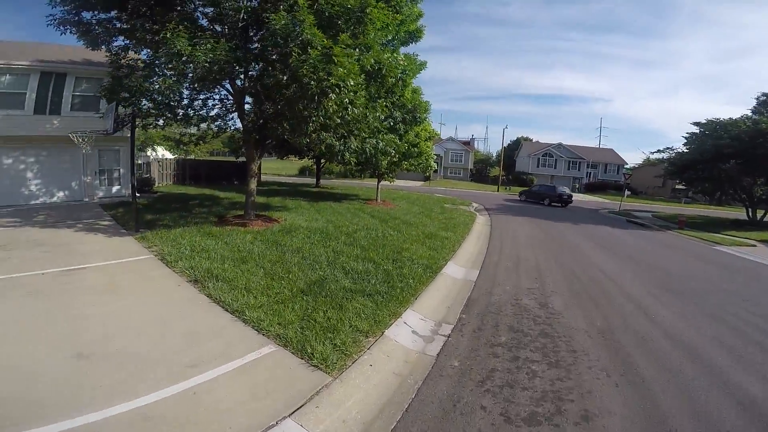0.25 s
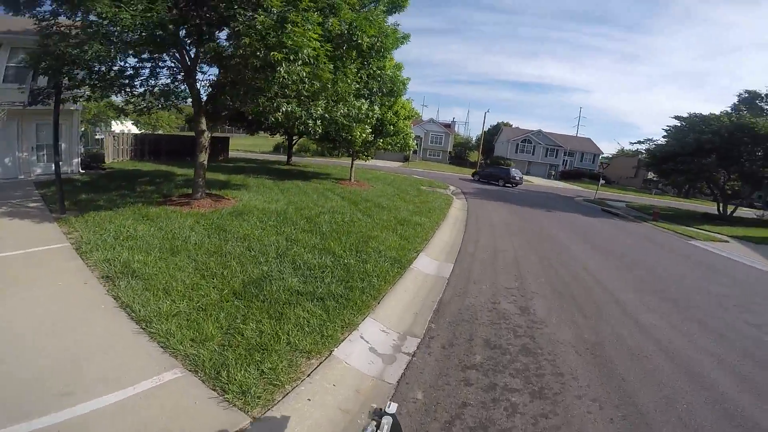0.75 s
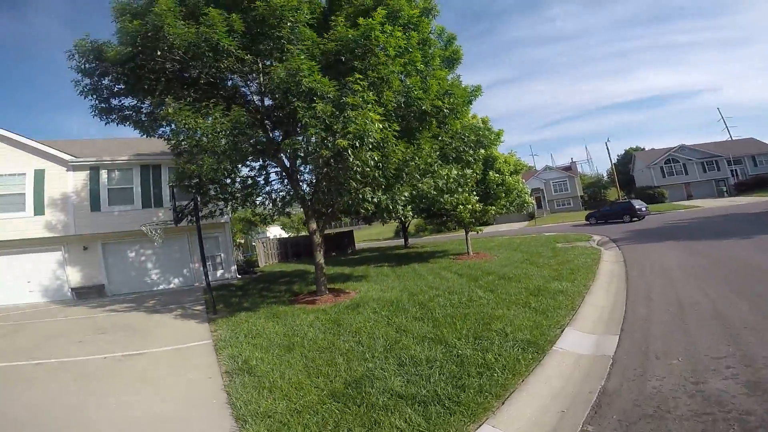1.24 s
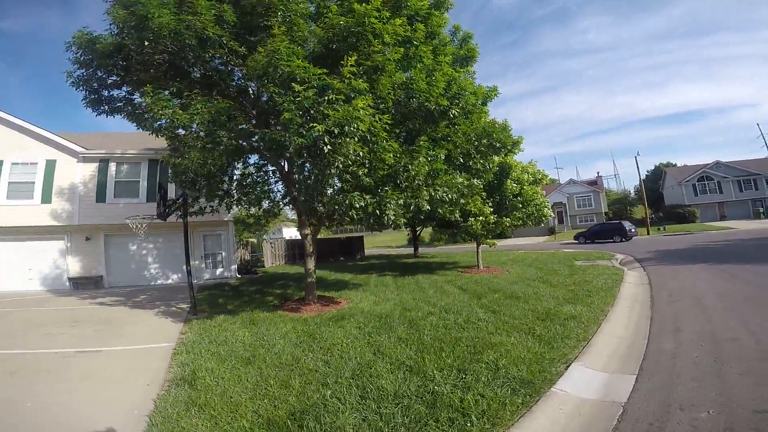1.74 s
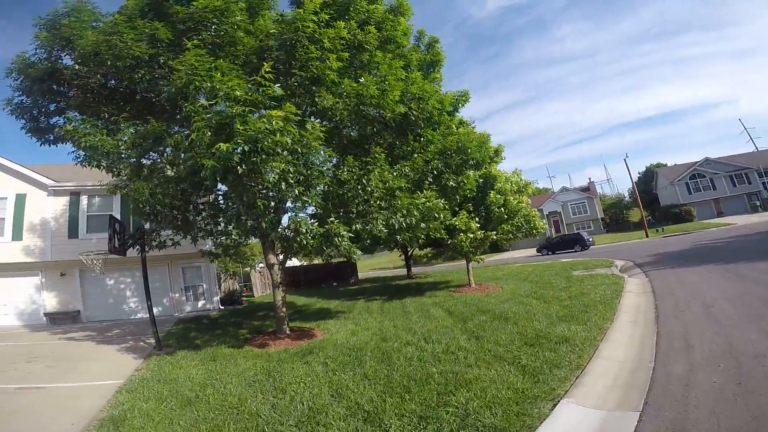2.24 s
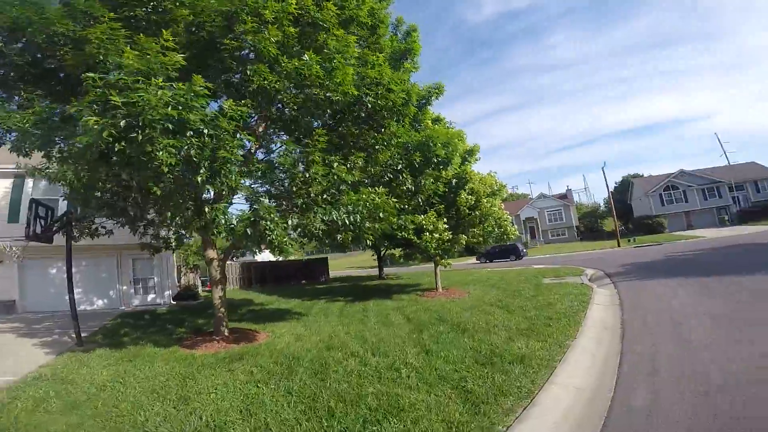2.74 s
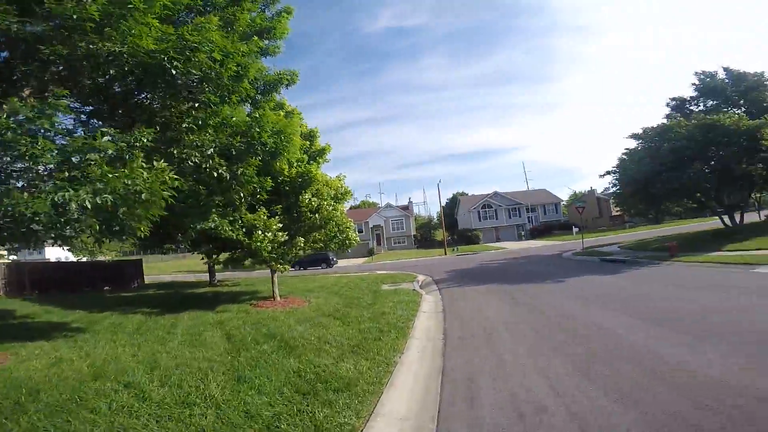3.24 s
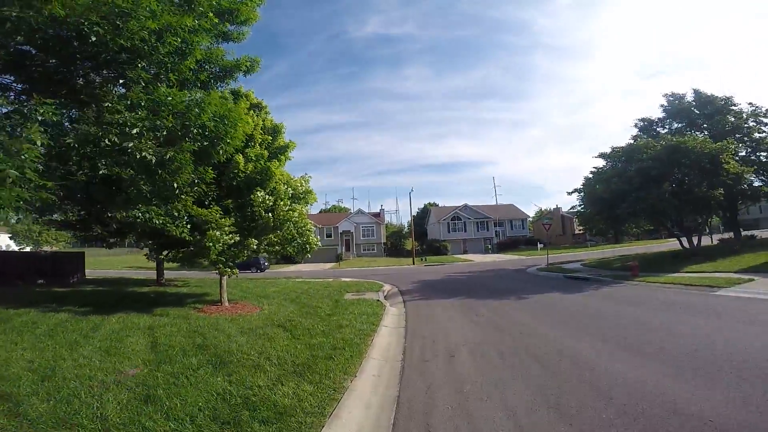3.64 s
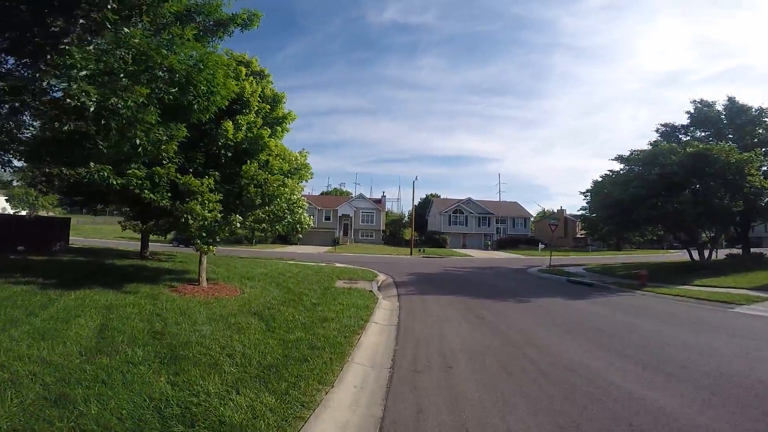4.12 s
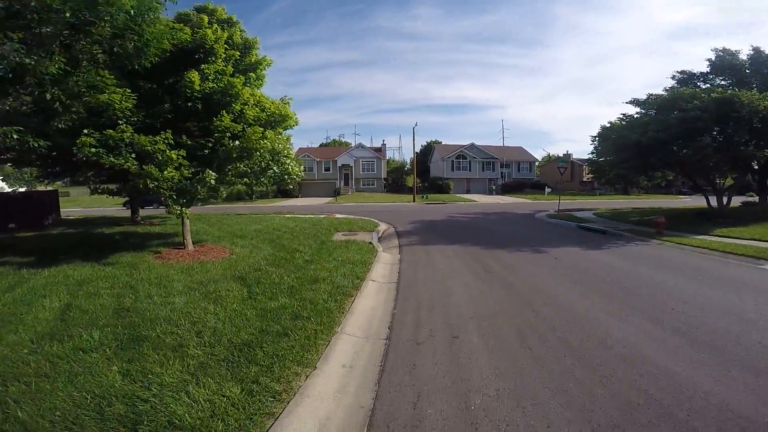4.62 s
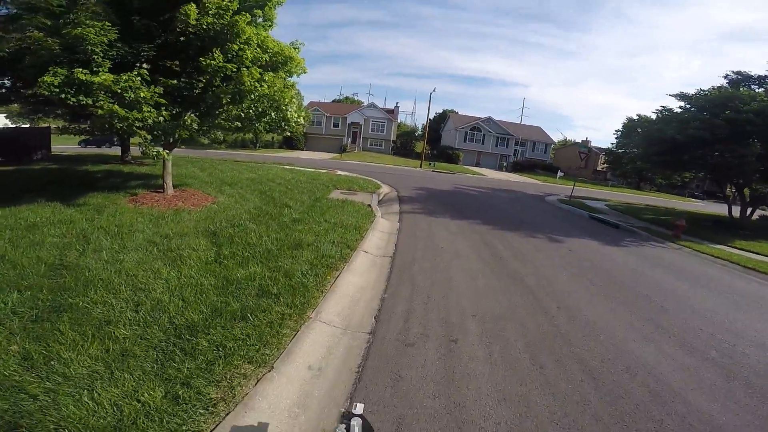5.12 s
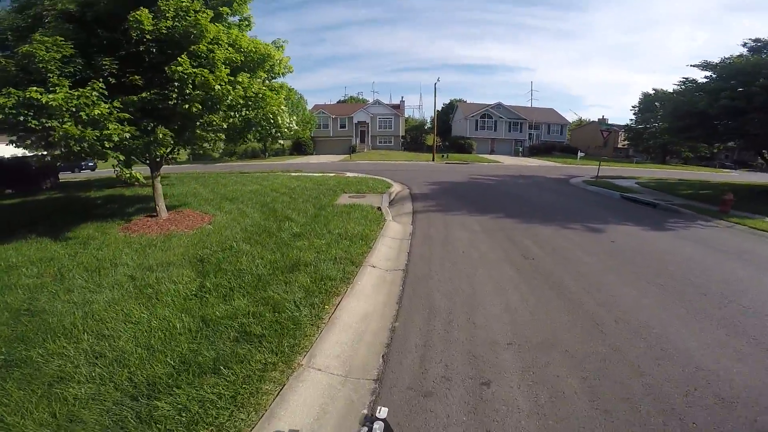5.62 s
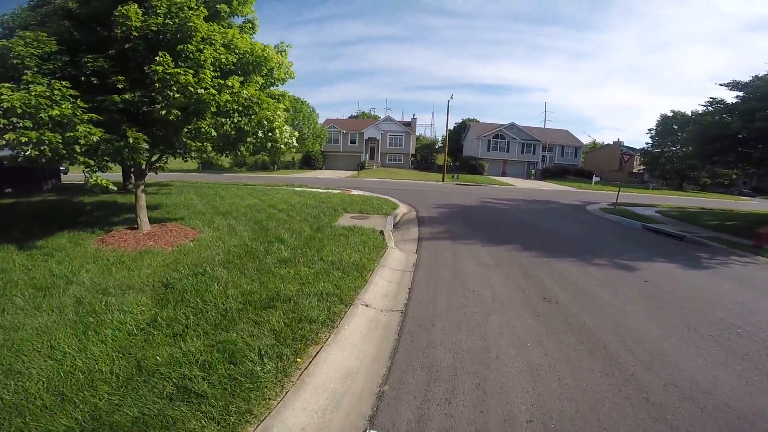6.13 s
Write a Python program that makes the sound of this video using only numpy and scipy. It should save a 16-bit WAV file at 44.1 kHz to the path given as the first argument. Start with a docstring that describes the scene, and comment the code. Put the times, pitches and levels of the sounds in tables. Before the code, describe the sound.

A small petrol engine, a garden edger carried along a residential street, is already idling at 0 s and never stops. It fires roughly ten times a second, slightly uneven in timing and strength: each firing is a short, dry, raspy pop with a hollow low muffler ring and a hard, bright metallic edge. Between pops, pistons and gears chatter over a steady rough clatter. Footfalls come about every 0.55 s from the start to around 6.2 s, each a very deep, soft thump and fluttering wobble shaking the body-worn microphone. From about 1 s the clatter swells and brightens, strongest between 1.4 and 3 s, with some sharper cracks. Just after 3 s the treble drops back and the idle settles, duller and steadier, until the end near 6.4 s. Faint street air lies underneath; the sound is close and dry, without a clear rev-up.

```python
"""From the start a small petrol engine idles, carried by a walker: it fires on every second turn of the crank.
At each firing, port pulses ring the muffler and a burst of blast noise rings the hard case round the microphone;
contacts of piston, ports and gears then rattle the case until the next firing, over a steady clatter.
About every half second a footfall jolts the body-worn microphone into a deep decaying wobble.
The clatter grows after the first second and eases after the third; faint street noise lies under it all."""
import sys
import numpy as np
from scipy import signal
from scipy.io import wavfile

SR = 44100
rng = np.random.default_rng(int(sys.argv[2]) if len(sys.argv) > 2 else 0)


def master_out(mix):
    """Clip the mix to full scale and print it as 16-bit PCM to the path in sys.argv[1]."""
    frames = np.transpose(np.atleast_2d(mix))
    ceiling = np.clip(frames, -1, 1)
    pcm = np.round(ceiling * 32767).astype(np.int16)
    wavfile.write(sys.argv[1], SR, pcm)


def level_to_linear(level):
    """Convert decibel levels to linear amplitude factors, elementwise."""
    exponent = np.asarray(level, float) / 20
    return 10 ** exponent


N = 280917  # length in samples

# Far street and air spectrum, before its overall level is set.
# Each row: frequency in Hz, relative density in dB per Hz.
STREET_SPECTRUM = [(70, -9.5), (100, -13), (150, -26.5), (200, -35), (260, -23.5), (330, -26), (850, -30),
                   (1300, -45), (2200, -36), (6000, -40.5), (8000, -47), (15000, -49.5)]
# Heel strikes, feet in turn. Each row: crest in seconds, wobble peak in dB, wobble in Hz,
# base level in dB of the lesser jolts before the heel, base level in dB of those after it.
FOOTSTEPS = [(0.019, -5, 24.4, -53, -20), (0.556, -8, 29, -18, -14), (1.11, -7, 31.2, -13.5, -17),
             (1.684, -7, 35, -18.5, -12.5), (2.223, -9, 33.4, -19.5, -14), (2.797, -8, 33.7, -24, -13.5),
             (3.332, -10.5, 36.3, -16, -18), (3.91, -7, 33.8, -18, -13.5), (4.461, -8.5, 35.6, -14, -16),
             (5.036, -8.5, 32.7, -21, -13), (5.582, -9.5, 35, -36, -18.5), (6.161, -7, 34.9, -18, -14.5)]
# Lesser jolts round each heel, one list per foot. Each row: time from the heel in ms,
# level in dB over the base level of that step, wobble in Hz, rise in ms, ring in ms.
LESSER_JOLTS = [
    [(-43.5, -7.6, 35.4, 21, 31), (42.5, -7.5, 29.4, 23, 64), (84.5, 0.5, 26.9, 27, 36),
     (126.5, -1, 34, 23.4, 82)],
    [(-123, 1, 41, 11, 33.5), (-41, -3, 35, 21, 50), (40, -6.5, 35.2, 22, 50),
     (82.5, -0.1, 35.04, 22.6, 91), (150.5, -5.5, 35.9, 19, 65.4)],
]
# Fall time of the heel wobble in ms: first foot, second foot.
HEEL_FALL_MS = [44, 30]
# Low random rumble through each stride, strongest round each heel.
# Each row: share of the way from heel to heel, rms in dB.
STRIDE_RUMBLE = [(0.0, -25.5), (0.08, -24.5), (0.34, -39), (0.72, -35), (1.0, -24)]
# Engine firings. Each row: time in seconds, strength in dB before the group offsets,
# 1.8 kHz ring in dB over the strength, crack above 4.7 kHz in dB over the strength.
ENGINE_FIRINGS = [(0.0482, -33.5, -9, -12.5), (0.1416, -26.5, -9.5, -20.5), (0.2424, -28, -14, -17),
                  (0.3278, -26.5, -15, -17), (0.4211, -30.5, -8.5, -12), (0.5159, -24.5, -18, -21),
                  (0.6067, -28.5, -11.5, -19), (0.7037, -27, -14.5, -18.5), (0.8052, -29, -13, -18),
                  (0.9076, -25.5, -12.5, -23), (1.002, -25.5, -16, -21), (1.0946, -28, -13.5, -16.5),
                  (1.1809, -30, -10.5, -18), (1.2815, -23.5, -20, -20), (1.3722, -27.5, -10, -18),
                  (1.475, -25, -14, -15.5), (1.5673, -23, -14.5, -14), (1.6613, -26.5, -7.5, -9),
                  (1.7593, -24.5, -12.5, -16.5), (1.866, -20.5, -13.5, -19), (1.9573, -23, -15, -12),
                  (2.0473, -27, -7, -10), (2.1444, -28, -10, -12), (2.2376, -23.5, -13, -16.5),
                  (2.3363, -29, -7.5, -11), (2.436, -22.5, -18, -18), (2.5229, -28.5, -8.5, -14),
                  (2.621, -29.5, -10.5, -15), (2.7305, -28, -9.5, -10.5), (2.801, -37, -16, -9),
                  (2.9028, -22, -14.5, -17), (2.997, -20.5, -14, -19), (3.0784, -22.5, -14, -15.5),
                  (3.1672, -24.5, -14, -19.5), (3.265, -23.5, -14, -22.5), (3.365, -24, -24, -23),
                  (3.461, -26, -6.5, -23), (3.5626, -27, -6, -19), (3.6663, -22.5, -14, -21.5),
                  (3.7609, -26, -13, -20), (3.8591, -24, -15, -21), (3.9514, -23, -14, -21.5),
                  (4.0458, -26, -12, -20), (4.138, -22.5, -12.5, -21.5), (4.235, -25.5, -12.5, -20),
                  (4.3332, -26.5, -13, -15.5), (4.429, -24, -17, -20), (4.5194, -25, -14, -21),
                  (4.6136, -26, -14.5, -20), (4.7058, -26.5, -10, -25), (4.8097, -25.5, -12, -20),
                  (4.9079, -29, -12.5, -14.5), (5.002, -24.5, -12.5, -19), (5.0887, -25.5, -13, -22),
                  (5.1792, -31.5, -13, -25), (5.2825, -26.5, -13.5, -22), (5.3816, -26.5, -19, -22.5),
                  (5.476, -24.5, -19, -20), (5.5694, -29.5, -11, -18.5), (5.6746, -28.5, -9, -22),
                  (5.7749, -28.5, -16, -20), (5.8704, -25.5, -17.5, -19), (5.9621, -24.5, -13.5, -21),
                  (6.0526, -27, -13.5, -20.5), (6.1477, -28.5, -16, -22), (6.241, -25.5, -14, -23.5),
                  (6.3405, -24, -14.5, -24)]
# Muffler resonances. Each row: frequency in Hz, 60 dB decay time in seconds.
MUFFLER_MODES = [(137, 0.25), (240, 0.054), (420, 0.022), (555, 0.01), (800, 0.023)]
# Port pulses. Each row: share of the cycle (negative: before the firing), sign,
# time in ms until the ringing is shut off.
PORT_PULSES = [(-.026, -1, 20), (-.022, 1, 19), (.115, -1, 12), (.494, 1, 11), (.606, -1, 14)]
# Port pulse levels before swing, scatter and smoothing.
# Each row, one per port pulse: level in dB for each muffler resonance in turn.
PORT_LEVELS = [(-53.5, -63, -45, -45, -63.5), (-39, -58.5, -45.5, -44.5, -93), (-66, -46, -56, -47.5, -56),
               (-43.5, -46.5, -54.5, -64, -82), (-61, -45, -54, -55, -87)]
# Case resonances round the microphone, in five groups. Each row: frequency in Hz, width in Hz, relative dB.
CASE_GROUPS = [
    [(1242, 61, -12.5), (1620, 50, -16), (1697, 134, -3), (1903, 147, 9.5)],
    [(2596, 60, -4), (2802, 87, 0), (2804, 150, -4), (3160, 190, 7.5)],
    [(3779, 120, 14), (3960, 330, 12.5), (4260, 33, 10.5), (4600, 70, -27)],
    [(4860, 150, 0), (5170, 470, 7.5), (5570, 130, 4.5), (5640, 160, -4), (6650, 180, -19),
     (6680, 110, 0.5)],
    [(7200, 130, -1), (7710, 61, -2), (8170, 150, -4), (9520, 530, -1.5), (10750, 740, -9),
     (13300, 500, -12), (14250, 380, -10)],
]
# Pass band of each case group. Each row: low edge in Hz, high edge in Hz.
CASE_BANDS = [(900, 1817), (2200, 3283), (3460, 4500), (4760, 6450), (6900, 14300)]
# Steady clatter as the engine swings nearer and away, before the group offsets.
# Each row: time in seconds, level in dB at 2-4.5 kHz, level in dB of the treble above 4.7 kHz.
CLATTER_CURVE = [(0.02, -46.5, -60), (0.48, -47.5, -61.5), (0.9, -49.5, -61), (1.43, -44, -57.5),
                 (1.77, -43.5, -57), (2.16, -44, -56.5), (2.64, -45, -56.5), (2.99, -44, -55),
                 (3.2, -47.5, -63), (3.48, -48, -64.5), (3.98, -47, -63.5), (6.37, -49, -65)]
# One entry per case group: column of the clatter curve that drives it.
CLATTER_COLUMN = [1, 1, 1, 2, 2]
# One entry per case group: firing column that colours its blast (0: none).
BLAST_COLUMN = [2, 0, 0, 3, 3]
# One entry per case group: offset in dB on the clatter.
CLATTER_OFFSET_DB = [-8.5, -8, -11.5, -5, -19.5]
# One entry per case group: offset in dB on the blast.
BLAST_OFFSET_DB = [-3.5, -13, -18, -4.5, -15]
# One entry per case group: share of the cycle at which the blast enters it;
# the 1.8 kHz ring speaks first, the 4 kHz ring last.
BLAST_ENTRY = [-0.0174, -0.0077, -0.003, -0.0053, -0.0056]
# Contacts of piston, ports and gears. Each row: share of the two-turn cycle, decay in ms,
# dB over the clatter, frequency in Hz where it rings most, dB lost one octave away.
ENGINE_CONTACTS = [(.05, 23.5, 8.5, 3570, 3), (.135, 3, 14.5, 8500, 9.5), (.185, 6, 8.5, 3930, 36),
                   (.245, 3.4, 8, 4000, 14), (.32, 8.8, 11.5, 2730, 47), (.358, 1, 11.5, 4600, 6),
                   (.56, 5.8, 6.5, 3400, 11.5), (.612, 2.6, 6, 6000, -0.5), (.68, 3.6, 8.5, 3900, 24),
                   (.745, 4.1, 11, 3800, 22), (.85, 9.6, 9.5, 2680, 41), (.882, 1.7, 9, 4200, 4),
                   (.925, 5.2, 7, 2520, 26)]

STREET_DB = -56.5                # rms
SHAKE_DB, SNAP_DB = -18, -11.5   # relative to the wobble of each jolt
HEEL_RISE_MS = 28.5
PORT_FOLLOWS = 0.27              # share of a firing's swing in dB that its port pulses follow


def rms_one(x):
    """Scales to rms 1."""
    return x / np.sqrt(np.mean(x ** 2) + 1e-20)


def band(x, low_hz, high_hz, order=2):
    """Butterworth band-pass."""
    return signal.sosfilt(signal.butter(order, [low_hz, high_hz], "band", fs=SR, output="sos"), x)


def street():
    """Smooth far noise, built from half-octave bands."""
    hz, db = np.transpose(STREET_SPECTRUM)
    edges = 70 * 2 ** np.arange(0, 8.1, .5)
    white = rng.standard_normal((2, N))   # neighbouring bands take different noise
    total = np.zeros(N)
    for k, (low, high) in enumerate(zip(edges, edges[1:])):
        level_db = np.interp(np.log(low * high) / 2, np.log(hz), db)
        total += level_to_linear(level_db) * band(white[k % 2], low, high)
    return level_to_linear(STREET_DB) * rms_one(total)


def jolts():
    """Heel strikes and lesser jolts of each foot: crest s, wobble peak dB, wobble Hz, rise ms, ring ms."""
    rows = []
    for k, (s, heel_db, heel_hz, before_db, after_db) in enumerate(FOOTSTEPS):
        foot = k % 2
        rows.append((s, heel_db, heel_hz, HEEL_RISE_MS, HEEL_FALL_MS[foot]))
        for ms, db, hz, rise_ms, ring_ms in LESSER_JOLTS[foot]:
            base_db = before_db if ms < 0 else after_db
            rows.append((s + ms / 1000, db + base_db, hz, rise_ms, ring_ms))
    return rows


def footfalls(snap_ms):
    """Each jolt snaps and wobbles the mount with loose shaking; a low random rumble never stops."""
    out, moving = np.zeros(N), np.zeros(N)
    for s, db, hz, rise_ms, ring_ms in jolts():
        at = np.arange(max(int((s - .08) * SR), 0), min(int((s + .2) * SR), N))
        ms = 1000 * (at / SR - s)
        bell = level_to_linear(db) * np.exp(-(ms / np.where(ms < 0, rise_ms, ring_ms)) ** 2)
        wobble = bell * np.cos(2 * np.pi * hz * (at / SR - s))
        snap = level_to_linear(db + SNAP_DB) * (1 - 2 * (ms / snap_ms) ** 2) * np.exp(-(ms / snap_ms) ** 2)
        out[at] += wobble + snap
        moving[at] += bell
    # one second of run-in lets the filters settle
    shake = rms_one(band(rng.standard_normal(N + SR), 32.7, 53.8, order=4)[SR:])
    rumble = rms_one(band(rng.standard_normal(N + SR), 23.76, 54, order=4)[SR:])
    heels = [step[0] for step in FOOTSTEPS]
    heels += [heels[-1] + np.mean(np.diff(heels))]
    stride = np.interp(np.arange(N) / SR, heels, np.arange(len(heels))) % 1
    rumble_gain = level_to_linear(np.interp(stride, *np.transpose(STRIDE_RUMBLE)))   # strongest round each heel
    return out + level_to_linear(SHAKE_DB) * moving * shake + rumble_gain * rumble


def clicks_at(share, sizes):
    """One click per engine cycle at this share of the way to the next firing."""
    fired = np.array(ENGINE_FIRINGS)[:, 0]
    cycle = np.arange(len(fired)) - (share < 0)   # a negative share lies in the cycle before
    s = fired + share * np.diff(fired)[np.clip(cycle, 0, len(fired) - 2)]
    out = np.zeros(N + SR)
    out[(s * SR).astype(int)] = sizes
    return out[:N]


def ring(clicks, hz, t60, open_ms):
    """Each click sets a decaying sine ringing, with its own height, until it is shut off."""
    t = np.arange(SR // 20) / SR
    shut = np.exp(-(1000 * t / open_ms) ** 4)
    shape = np.sin(2 * np.pi * hz * t) * level_to_linear(-60 * t / t60) * shut
    return signal.oaconvolve(clicks, shape)[:N]


def exhaust(scatter_db):
    """Ports open and close on both turns and ring the muffler; only the first turn fires."""
    out = np.zeros(N)
    fired_db = np.array(ENGINE_FIRINGS)[:, 1]
    swing_db = PORT_FOLLOWS * (fired_db - fired_db.mean())
    for (share, sign, open_ms), levels in zip(PORT_PULSES, PORT_LEVELS):
        scatter = scatter_db * rng.standard_normal((len(ENGINE_FIRINGS), len(MUFFLER_MODES)))
        for k, (hz, t60) in enumerate(MUFFLER_MODES):
            heights = sign * level_to_linear(levels[k] + swing_db + scatter[:, k])
            out += ring(clicks_at(share, heights), hz, t60, open_ms)
    return signal.lfilter([.15], [1, -.85], out)    # a port does not open at once


def resonate(x, hz, width_hz):
    """Two-pole resonance with gain 1 on top."""
    r = np.exp(-np.pi * width_hz / SR)
    return signal.lfilter([(1 - r * r) / 2, 0, (r * r - 1) / 2], [1, -2 * r * np.cos(2 * np.pi * hz / SR), r * r], x)


def swell(clicks, rise_ms, decay_ms):
    """Each click becomes a burst envelope of its height that rises fast and dies away."""
    up, down = np.exp(-1000 / (SR * np.maximum([rise_ms, decay_ms], .2)))
    poles = np.convolve([1, -up], [1, -down])
    top = signal.lfilter([1], poles, np.arange(1000) == 0).max()
    return signal.lfilter([1 / top], poles, clicks + 1e-18)


def drift(rate_hz):
    """Low-passed random wander of rms 1."""
    r = np.exp(-2 * np.pi * rate_hz / SR)
    return rms_one(signal.lfilter([1], [1, -2 * r, r * r], rng.standard_normal(N + SR))[SR:])


def through_case(x, k):
    """The resonances of case group k ring side by side, their skirts cut."""
    rung = sum(level_to_linear(db) * resonate(x, hz, width) for hz, width, db in CASE_GROUPS[k])
    return band(rung, *CASE_BANDS[k], order=3)


def contact_power(k, scatter_db):
    """Each contact bursts once a cycle, weaker the further case group k lies from its pitch; powers add."""
    scatter = scatter_db * rng.standard_normal((len(ENGINE_FIRINGS), len(ENGINE_CONTACTS)))
    modes = CASE_GROUPS[k]
    centre_hz = np.average([hz for hz, _, _ in modes], weights=[level_to_linear(db) for _, _, db in modes])
    power = np.zeros(N)
    for j, (share, decay_ms, db, hz, fall_db) in enumerate(ENGINE_CONTACTS):
        level_db = db - fall_db * np.log2(centre_hz / hz) ** 2 + scatter[:, j]
        power += swell(clicks_at(share, level_to_linear(level_db)), 0.6, decay_ms) ** 2
    return power


def firing_blast(k, flame, blast_ms):
    """Bursts of flame noise ring case group k, each levelled to the strength of its firing."""
    firings = np.array(ENGINE_FIRINGS)
    start = (firings[:, 0] * SR).astype(int)
    blast = through_case(swell(clicks_at(BLAST_ENTRY[k], 1), 0.84, blast_ms) * flame, k)
    rms = np.sqrt(np.mean(blast[start[:, None] + np.arange(-60, 260)] ** 2, 1))
    colour_db = firings[:, BLAST_COLUMN[k]] if BLAST_COLUMN[k] else 0
    gain = level_to_linear(firings[:, 1] + colour_db + BLAST_OFFSET_DB[k]) / rms
    # the gain moves on 10 ms ahead of each firing
    return blast * gain[np.searchsorted(start[1:] - SR // 100, np.arange(N))]


def case_noise(scatter_db, grain_db, blast_ms, taps_per_s, tap_share):
    """Blast, contacts and steady clatter gate rough noise into each group of case resonances."""
    clatter, out = np.array(CLATTER_CURVE), np.zeros(N)
    grain = level_to_linear(grain_db * drift(390))      # rattling parts: the groups flicker together
    tapped = rng.random(N) < taps_per_s / SR
    taps = tapped * rng.standard_normal(N) * np.sqrt(SR / taps_per_s)   # loose metal, felt by all groups
    flame = rng.standard_normal(N)          # one blast reaches all groups
    for k in range(len(CASE_GROUPS)):
        curve_db = np.interp(np.arange(N) / SR, clatter[:, 0], clatter[:, CLATTER_COLUMN[k]])
        steady = level_to_linear(curve_db + CLATTER_OFFSET_DB[k])
        knocks = contact_power(k, scatter_db[k])
        noise, reference = rng.standard_normal((2, N))
        rattle = np.sqrt(tap_share) * taps + np.sqrt(1 - tap_share) * noise   # tap_share is a share of power
        rung = through_case(steady * grain * np.sqrt(1 + knocks) * rattle, k)
        out += rung / np.std(through_case(reference, k))   # undo the gain of the group on plain noise
        out += firing_blast(k, flame, blast_ms[k])
    return out


def scene():
    """Street, footfalls and engine, summed to one channel."""
    engine = exhaust(scatter_db=2.5)
    engine += case_noise(scatter_db=[2.0, 2.7, 2.7, 4.8, 5.1], grain_db=1.0,
                         blast_ms=[2.33, 3.5, 3.5, 2.7, 2.9], taps_per_s=1500, tap_share=0.39)
    return (street() + footfalls(snap_ms=7.3) + engine)[None]


def low_pass(x):
    """Removes everything above the highest recorded frequency."""
    return signal.sosfilt(signal.butter(12, 15700, fs=SR, output="sos"), x)


def record(dry):
    """A steep low-pass takes the top off the mix above 15 kHz."""
    dull = signal.sosfilt(signal.butter(10, 15000, fs=SR, output="sos"), dry)
    return low_pass(dull)


dry = scene()
out = record(dry)
master_out(out)
```